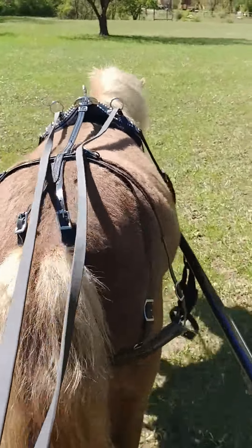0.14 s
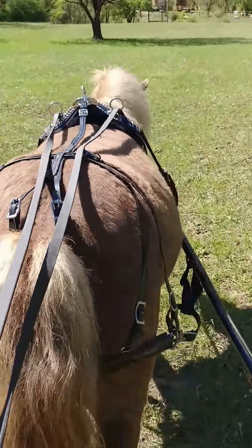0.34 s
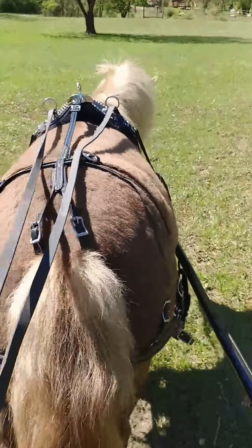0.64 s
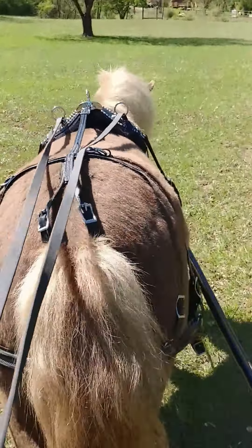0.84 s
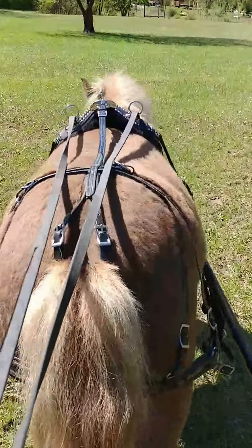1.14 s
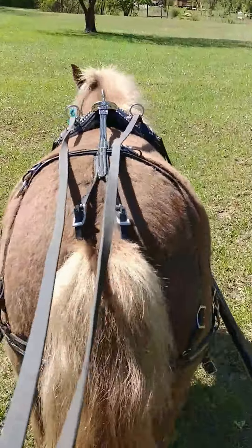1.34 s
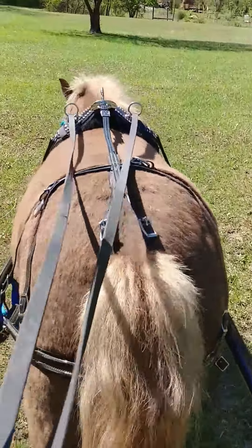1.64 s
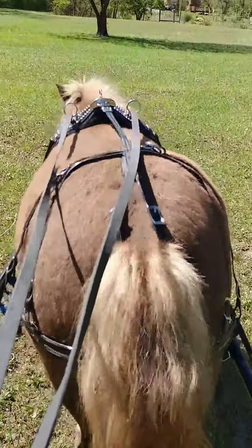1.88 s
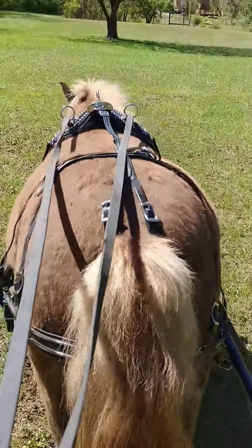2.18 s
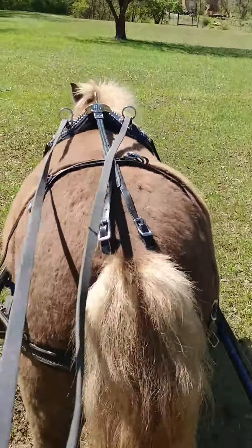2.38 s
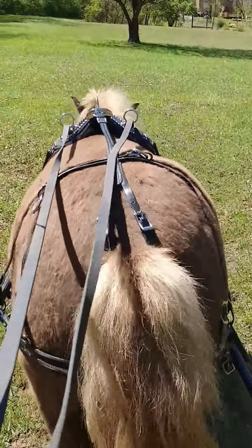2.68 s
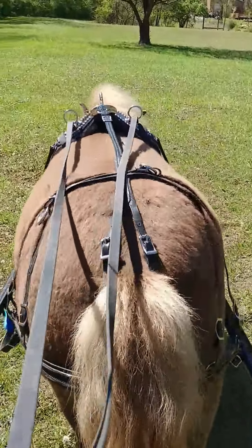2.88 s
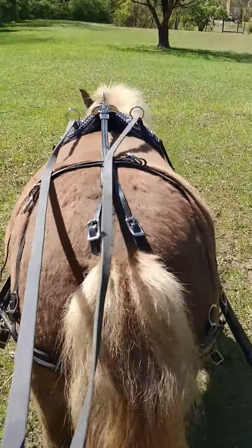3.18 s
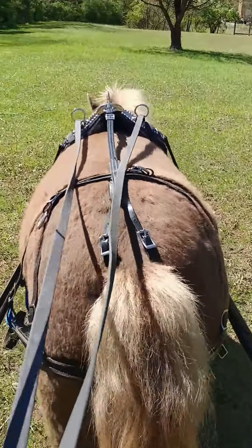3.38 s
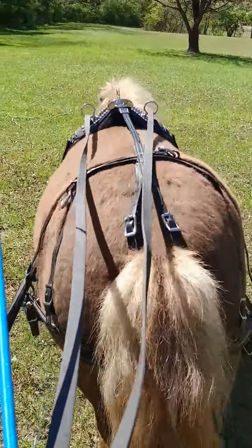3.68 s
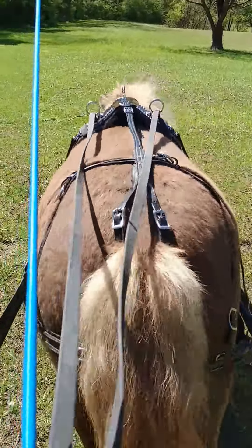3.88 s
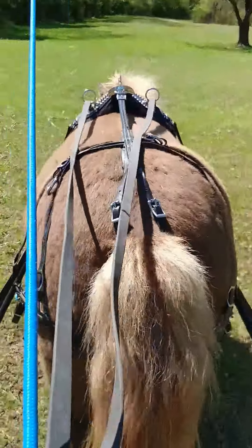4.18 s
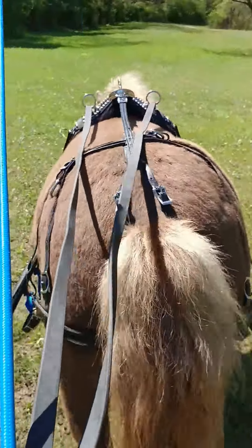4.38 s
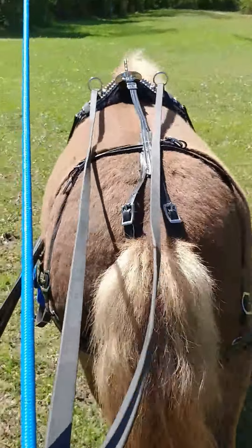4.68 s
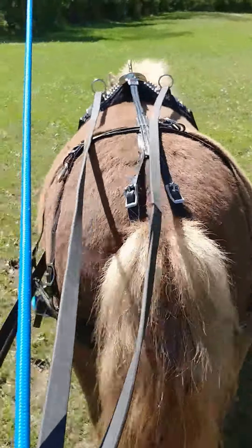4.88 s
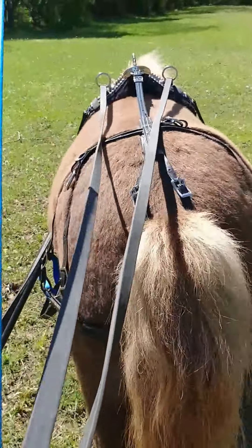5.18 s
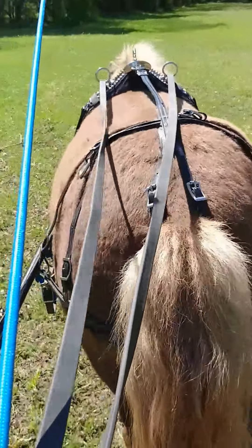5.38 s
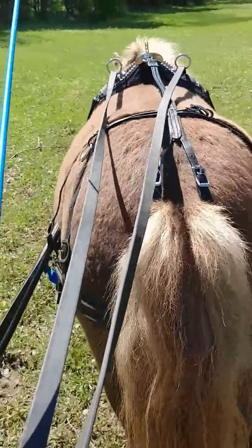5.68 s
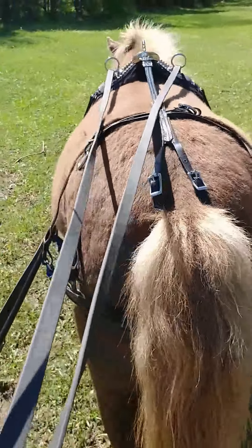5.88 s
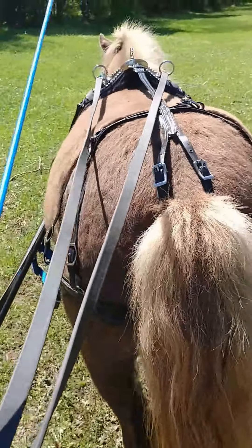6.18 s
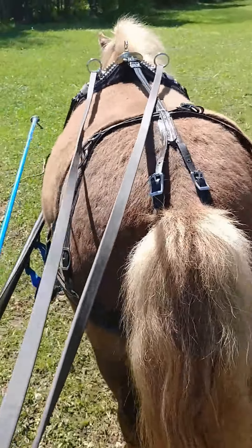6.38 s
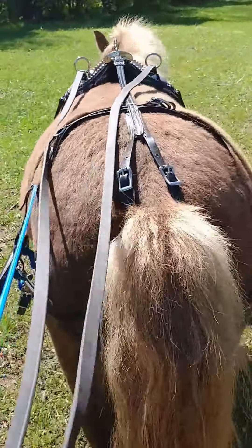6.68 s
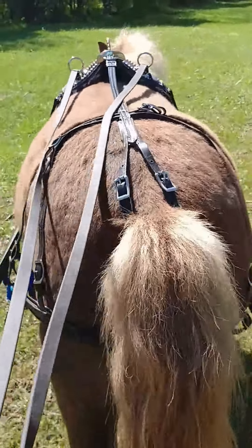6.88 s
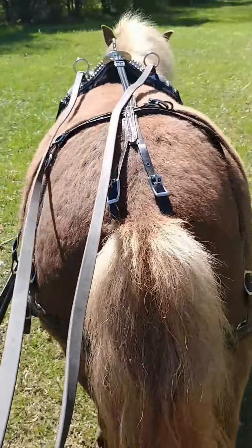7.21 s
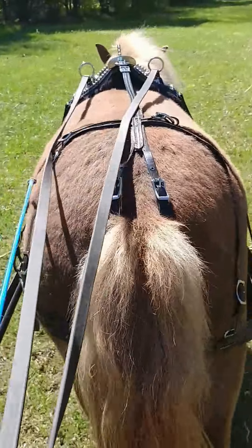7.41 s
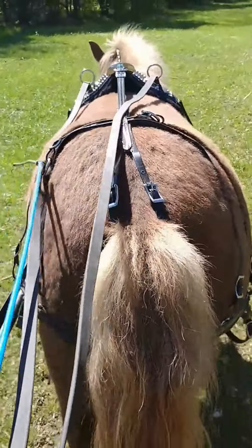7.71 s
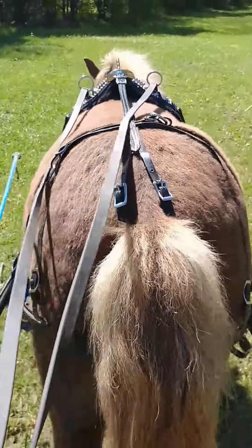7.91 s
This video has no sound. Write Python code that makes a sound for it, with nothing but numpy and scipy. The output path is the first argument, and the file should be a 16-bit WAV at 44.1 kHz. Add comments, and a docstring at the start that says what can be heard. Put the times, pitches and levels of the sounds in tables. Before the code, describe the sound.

Heard from a cart seat outdoors, a low hum wavers and briefly drops out over soft wheel rumble and muffled hoof treads in grass. A bright steel clink comes at 0.1 s with a dull bump just after, then straps swish. Paired knocks fall at 0.8, a clear one at 1.0 and a snap at 1.15. A dry click at 1.6 precedes strong clinks at 1.8, 2.1 and 2.7, and another click at 3.0. The hardest knock rings at 3.6. After lighter swishing, clinks cluster from 4.6 to 4.9 and 5.3 to 5.5, capped by a sharp dry snap at 5.6 and a lesser one at 5.8. A single clink at 6.2, then low bumps and a hum surge with a deeper clink around 6.6. Sparse clinks at 7.2 and 8.0 end it among strap rustles and faint buckle jingles.

```python
"""On a lawn, heard from the seat of a cart, a pony walks in harness.
A low wavering hum lies under the soft rumble of wheels and hoofs, made from shaped noise.
Dull bumps are short low tones; straps, buckles and dry snaps are swelling or clicking noise and steel rings.
In front, steel fittings knock on the shafts: each blow rings the steel and the crowded modes of the frame."""
import sys
import numpy as np
from scipy import signal
from scipy.fft import rfft, irfft
from scipy.io import wavfile
from scipy.ndimage import uniform_filter1d

SR = 44100
rng = np.random.default_rng(int(sys.argv[2]) if len(sys.argv) > 2 else 0)


def pcm_store(signal):
    """Save signal as 16-bit PCM."""
    levels = np.round(np.clip(np.atleast_2d(signal), -1, 1) * 32767)
    wavfile.write(sys.argv[1], SR, levels.astype(np.int16).T)


N = 355005
TIME = np.arange(N) / SR  # seconds

# The low hum, before it wavers: (t/s, level/dB)
HUM_LEVEL = [(0.0, -47.5), (0.18, -44.5), (0.4, -49), (1.15, -46.5), (1.85, -49.5), (2.4, -47),
             (3.4, -45.5), (4.3, -45.5), (4.55, -54), (4.76, -47), (5.2, -51), (6.0, -46.5), (6.47, -51.5),
             (6.63, -37.5), (6.95, -51.5), (7.5, -50.5), (8.05, -49.5)]
# Moments when the hum drops out: (t/s, depth/dB, length of each side/s)
HUM_DIPS = [(2.11, 24, 0.028), (2.269, 18, 0.028), (2.592, 23, 0.03), (5.254, 30, 0.09), (7.513, 9, 0.028)]
HUM_HZ, HUM_WAVER_DB, HUM_WAVER_HZ = 60.0, 1.5, 8.0
HUM_PHASE_RAD = 0.45  # right microphone ahead of the left

# Wheels rolling over the grass, before the gain below: (t/s, level/dB)
ROLL_LEVEL = [(0.0, -78), (0.27, -63), (2.71, -61.5), (3.07, -62.5), (3.81, -58.5), (4.03, -62.5),
              (6.55, -61.5), (8.05, -64)]
# Hoofs and wheels pressing into the turf: (t of peak/s, level/dB, length of each side/s)
TREADS = [(0.045, -53.5, 0.038), (0.164, -59, .035), (0.66, -62.5, 0.058), (0.95, -54.5, 0.0404),
          (1.063, -49.5, 0.034), (1.383, -57.5, 0.053), (1.844, -55.5, 0.02), (2.106, -57, 0.066),
          (2.302, -55.5, 0.011), (2.423, -56, 0.032), (2.727, -54, 0.049), (3.397, -53.5, 0.035),
          (3.53, -56.5, 0.034), (3.654, -47, 0.02), (3.78, -50.5, 0.044), (3.948, -59, 0.041),
          (4.588, -57, 0.046), (4.71, -56, .04), (4.9, -64, 0.048), (5.124, -53.5, 0.0518),
          (5.553, -63, 0.05), (6.003, -55, 0.018), (6.611, -45.5, .03)]
# Tone colour of the rumble, only the shape counts: (f/Hz, relative level per Hz/dB)
RUMBLE_COLOUR = [(20, -30.5), (35, -5), (48, -1.5), (80, 3), (105, -4.5), (160, -9.5), (250, -24),
                 (600, -51)]
# Tone colour of the pressed turf, only the shape counts: (f/Hz, relative level per Hz/dB)
TURF_COLOUR = [(80, -19), (200, 2), (300, -1), (550, -3), (900, -10), (1500, -14.5), (3000, -21),
               (8000, -36)]
ROLL_GAIN_DB, RUMBLE_DB = 1, -52
RUMBLE_PER_TURF = 0.62  # power below 1: the rumble swells less than the grass

# Dull bumps of hoof and wheel, before a shared 3 dB cut: (t/s, peak level/dB, f/Hz)
BUMPS = [(0.169, -28.5, 69), (1.06, -32.5, 68.5), (1.388, -52, 130), (3.39, -30, 88), (4.729, -46.5, 85),
         (5.55, -34, 69.6), (5.989, -33, 80), (6.6, -34.5, 74.3), (6.719, -38, 83.5)]

# Swishes of straps and small buckles: (start t/s, relative level/dB)
SWISHES = [(0.0, -48), (0.401, -51.5), (0.5, -58), (0.653, -52.5), (0.76, -62), (0.949, -56), (1.159, -52),
           (1.395, -56), (1.473, -55), (1.56, -58.5), (1.605, -59), (2.29, -61), (2.447, -52), (2.568, -57),
           (2.842, -53.5), (2.95, -54.5), (3.07, -54.5), (3.255, -55.5), (3.341, -49), (3.54, -59),
           (3.746, -51), (4.204, -50.5), (4.28, -57), (4.408, -60), (5.08, -59.5), (5.243, -53.5),
           (5.819, -56), (6.08, -55.5), (6.31, -56), (6.41, -56), (6.73, -72), (6.825, -64), (6.878, -60),
           (7.12, -50), (7.26, -62), (7.338, -51.5), (7.638, -50), (7.79, -59), (7.85, -58)]
# Tone colour of the rustle, only the shape counts: (f/Hz, relative level per Hz/dB)
BRUSH_COLOUR = [(600, -14.5), (1500, 1), (3500, -0.5), (5200, 1.5), (6200, -1), (7100, 1), (7900, 8.5),
                (9300, 9), (10800, -16), (13000, -3.5), (16000, -12)]
BRUSH_FLOOR_DB = -62.5  # swell between swishes, before the layer gains
SWISH_RISE_S, SWISH_HOLD_S, SWISH_FALL_S = 0.002, 0.02, 0.034
TOUCH_SHARE, TOUCH_T60_S = 0.4, 0.13  # share of the rustle's power, time to die by 60 dB
JINGLE_DB, JINGLES_PER_S = -5, 72  # small buckles shaken by the straps
JINGLE_T60_S = 0.07  # before each mode's own ring factor

# Dry snaps of strap and twig: (t/s, peak level/dB, f/Hz, bandwidth/Hz, time of the burst to die by 60 dB/s)
SNAPS = [(.866, -46.5, 660, 129, 0.069), (1.151, -31, 3560, 724, 0.05), (1.2, -48, 3700, 1200, 0.01),
         (1.573, -30.5, 8300, 3000, 0.0092), (2.991, -30.5, 7900, 6940, 0.02), (3.626, -53, 940, 200, .04),
         (4.975, -34, 7900, 3000, .006), (5.583, -19, 7200, 5000, 0.012), (5.785, -26, 1950, 900, 0.0078)]

# Blows of the fittings: (t/s, force/dB, extra steel ring/dB, extra depth/dB, extra brightness/dB,
# favoured high f/Hz, basic time to die by 60 dB/s, limited and scaled per mode below)
KNOCKS = [(0.097, -21.5, 4.5, 0, -2, 7960, 0.17), (0.143, -41, 3, 16, 5.5, 7240, 0.29),
          (0.261, -52, 2.5, 20, -1, 9200, 0.21), (0.32, -51, -3, 16, -6, 8540, .12),
          (0.806, -33.5, 0.5, 8.5, 2, 8900, 0.17), (0.825, -33, 1, 1, -4, 9400, 0.13),
          (1.0432, -22, 4, -5.5, 3.5, 8360, 0.19), (1.7816, -20, 6, -3, -3.5, 8370, .16),
          (1.842, -33, 5.5, -2, -14, 8600, 0.13), (1.989, -41, 4.5, 9, -11, 7660, 0.2),
          (2.066, -19.5, -1.5, -0.5, -5, 8100, 0.13), (2.148, -23.5, 2, 0, -11.5, 8100, 0.19),
          (2.19, -37, -6, 10, -1.5, 8300, 0.088), (2.701, -23.5, 5.5, -5, -5, 8920, 0.17),
          (3.6143, -17, -0.5, -4, -4, 9200, 0.15), (3.827, -43, -0.5, 2, -1, 8800, 0.13),
          (4.499, -47, 4.5, 24.5, 4, 7640, 0.17), (4.622, -47, 2, 10, -4, 8200, 0.38),
          (4.68, -33, 3.5, -4, -7.5, 7840, 0.49), (4.705, -24.5, 6.5, 7, 1, 7840, 0.13),
          (4.866, -42, 0, 24.5, 3, 8300, 0.14), (4.875, -28, -1.5, -5, -6, 7700, 0.2),
          (5.285, -34.5, 6.5, 3.5, 2.5, 8960, 0.15), (5.363, -27, -0.5, 1.5, -3, 8360, .18),
          (5.507, -33.5, 1, 6.5, 2, 7940, 0.25), (5.524, -28, 4.5, 17, 7, 8280, .14),
          (5.75, -49.5, 6, 7.5, 2.5, 7800, 0.22), (6.164, -27.5, -2.5, -1, -3.5, 8360, 0.17),
          (6.594, -42.5, 0, -4, -9.5, 7800, 0.64), (6.652, -29, -1, 7, -7, 8470, .19),
          (7.161, -27.5, -0.5, -2.5, -1.5, 8970, .16), (7.483, -55.5, 6, -13, 0, 7740, 0.12),
          (7.918, -49.5, 5.5, -8, -1, 8460, 0.6), (8.023, -30.5, -0.5, 2, 2.5, 8830, 0.26)]
# Modes of the steel fittings: (f/Hz, relative level/dB, factor on the ring time)
FITTINGS = [(1275, -25, 1.1), (1590, -23, 1.1), (2476, -23, 1), (3203, -18, 1), (3487, -15, 1),
            (3608, -13, 1), (4232, -12.5, 1), (4462, -14, 1), (5732, -7, 1.1), (6049, -4.5, 1.3),
            (6135, -4, 1.2), (6180, 0, 1.25), (6228, -5, 1.15), (6374, -6.5, 1), (6562, -5.5, 1),
            (6741, -7, 1), (7730, -6, 1), (7830, -5, 1.05), (7915, -5, 1.05), (7995, -6, 1), (8209, -7, .9),
            (8425, -7, .9), (8724, -7, .9), (8994, -6, .9), (9054, -7, .9)]
# Crowded modes of shafts and cart frame: (f/Hz, relative level per Hz/dB)
FRAME_COLOUR = [(200, -21.5), (1000, -12.5), (1500, -10), (2200, -5.5), (3450, 7), (3950, 3.5), (4350, 2),
                (5400, 2.5), (6250, 8), (7250, 15.5), (9100, 15), (10700, -6.5), (13000, 10.5), (16000, -8)]
# How long the frame rings at each pitch: (f/Hz, factor on the ring time)
FRAME_RING = [(800, 1.85), (2100, 1.19), (6000, 0.92), (9000, 0.9), (14000, 0.59)]
RAGGED_DB = 5.5  # unevenness between clusters of frame modes
LONGEST_RING_S = 0.21  # limit on the steel's ring time, before each mode's factor
CLATTER_DB, CLATTER_PER_DEPTH = -1.5, 0.62  # the deeper a blow, the more the frame clatters
PAN_DB, PAN_PER_DEPTH = 0.35, 0.08  # left minus right: the deep blows lie to the left

LEFT_LAG_S = 0.0002885  # the sound reaches the right microphone first
EDGE_HZ = 15900  # upper band limit


def gain_of(db):
    """Turns decibels into amplitude."""
    return 10 ** (np.asarray(db) / 20)


def evened(x):
    """Scales x to an overall rms of 1."""
    return x / np.sqrt(np.mean(x ** 2) + 1e-20)


def read(points, hz):
    """Reads a curve between its points, on a log-frequency axis."""
    f, value = np.transpose(points)
    return np.interp(np.log(hz + 1), np.log(f + 1), value)


def follow(points):
    """Reads a (time, value) curve at every sample."""
    t, value = np.transpose(points)
    return np.interp(TIME, t, value)


def add(mix, s, sound):
    """Mixes a sound in at time s, cutting it off at the end of the mix."""
    part = mix[:, round(s * SR):][:, :sound.shape[1]]
    part += sound[:, :part.shape[1]]


def drift(hz):
    """Random wandering of rms 1, changing at rates up to about hz."""
    f = np.fft.rfftfreq(N, 1 / SR)
    return evened(irfft(rfft(rng.standard_normal(N)) * np.exp(-(f / hz) ** 2), N))


def noise_pair(size, alike):
    """White noise at two microphones; alike is the share of power they have in common."""
    shared, *own = rng.standard_normal((3, size))
    alike = np.clip(alike, 0, 1)
    return np.sqrt(alike) * shared + np.sqrt(1 - alike) * np.array(own)


def coloured(x, spectrum):
    """Gives x a tone colour, at an overall rms of 1."""
    hz = np.fft.rfftfreq(N, 1 / SR)
    return evened(irfft(rfft(x) * gain_of(read(spectrum, hz)), N))


def hump(s, rise_s, fall_s):
    """A smooth bell-shaped swell of height 1 that peaks at time s."""
    side_s = np.where(TIME < s, rise_s, fall_s)
    return np.exp(-np.minimum(((TIME - s) / side_s) ** 2, 50))


def hum():
    """A low tone that wavers and now and then drops out, slightly out of step between the microphones."""
    turns = np.cumsum(HUM_HZ + 0.36 * drift(hz=2.95)) / SR
    phase = np.array([[0], [HUM_PHASE_RAD]])
    tone = np.sqrt(2) * np.sin(2 * np.pi * turns + phase)
    dips_db = sum(db * hump(s, length, length) for s, db, length in HUM_DIPS)
    level_db = follow(HUM_LEVEL) - dips_db + HUM_WAVER_DB * drift(hz=HUM_WAVER_HZ)
    return tone * gain_of(level_db + np.array([[0.5], [-0.7]]))


def rolling():
    """Wheels rumble and press the grass down unevenly; each tread swells both."""
    treads = sum(gain_of(db) ** 2 * hump(s, length, length) for s, db, length in TREADS)
    power = gain_of(follow(ROLL_LEVEL) + ROLL_GAIN_DB) ** 2 + treads
    turf_swell = np.sqrt(power) * gain_of(0.78 * drift(hz=7.8))

    rumble_swell = evened(turf_swell ** RUMBLE_PER_TURF) * gain_of(RUMBLE_DB + 0.5 * drift(hz=18))
    rumble = coloured(noise_pair(N, alike=0.97), RUMBLE_COLOUR) * rumble_swell

    crush = noise_pair(N, alike=0.75) * gain_of(1.73 * drift(hz=65.4))
    turf = coloured(crush, TURF_COLOUR) * turf_swell * gain_of(-0.3)
    return rumble + turf


def bumps(size=12000):
    """The cart body takes a jolt and swings a few times: a low tone that swells and dies."""
    out, t = np.zeros((2, N)), np.arange(size) / SR
    swell = t / 0.0034  # the envelope peaks after 3.4 ms
    envelope = swell * np.exp(1 - swell)
    for s, db, hz in BUMPS:
        add(out, s, gain_of(db - 3.0) * envelope * np.sin(2 * np.pi * hz * t)[None])
    return out


def swish(start_s, size=16000):
    """A strap slips: a quick start, a short slide, a soft fall."""
    t, out = np.arange(size) / SR, np.zeros((1, N))
    rise = 1 - np.exp(-t / SWISH_RISE_S)
    fall = np.exp(-np.maximum(t - SWISH_HOLD_S, 0) / SWISH_FALL_S)
    add(out, max(start_s, 0), (rise * fall)[None])
    return out[0]


def steel_ring(t60, size, spread_db=9.5, waver=0.9):
    """The fittings' own modes; each ring beats, and the two microphones hear a different mix of them."""
    t = np.arange(size) / SR
    hz, db, ring = np.transpose(FITTINGS)
    luck = rng.uniform(-0.91, 1, (len(FITTINGS), 6)).T
    strength = gain_of(db - 8.5 + spread_db * luck[0] + 0.69 * luck[1:3])
    phase = np.pi * luck[3] + 0.74 * luck[4:6]
    # the imaginary part sets the pitch, the real part the decay
    poles = 2j * np.pi * hz - np.log(1000) / (min(t60, LONGEST_RING_S) * ring)
    # a second tone close to each mode makes it beat, as the parts swing
    swing_hz, start = rng.uniform(-77.5, 72.0, (len(hz), 1)), rng.random((len(hz), 1))
    swing = 1 + waver * np.exp(2j * np.pi * (swing_hz * t + start))
    modes = np.exp(poles[:, None] * t) * swing
    return ((strength * np.exp(1j * phase)) @ modes).real


def brushing(touches_per_s=30, size=6000):
    """Hair and straps rustle in swishes, with tiny touches that die away and buckles that jingle."""
    touches = (rng.random(N) < touches_per_s / SR) * rng.uniform(0.029, 1, N)
    fade = np.exp(-2 * np.log(1000) / (TOUCH_T60_S * SR))  # power kept per sample
    dying = signal.lfilter([1], [1, -fade], touches)
    power = 1 - TOUCH_SHARE + TOUCH_SHARE * dying / dying.mean()
    grain = noise_pair(N, alike=0.128) * np.sqrt(power) * gain_of(1.5 * drift(hz=250))

    swish_power = sum((gain_of(db) * swish(s)) ** 2 for s, db in SWISHES)
    swell = np.sqrt(gain_of(BRUSH_FLOOR_DB) ** 2 + swish_power)
    rustle = coloured(grain, BRUSH_COLOUR) * swell * gain_of(2.5)

    shakes = evened((rng.random(N) < JINGLES_PER_S / SR) * rng.uniform(-1, 1, N))
    buckle = steel_ring(JINGLE_T60_S, size)
    buckle = buckle / np.linalg.norm(buckle[0])
    jingle = signal.oaconvolve((shakes * swell)[None], buckle, axes=1)[:, :N]
    return rustle + jingle * gain_of(JINGLE_DB)


def snaps(size=4000):
    """Short clicks: dying noise through one band, with no steel ring."""
    out, t = np.zeros((2, N)), np.arange(size) / SR
    for s, db, hz, width_hz, t60 in SNAPS:
        burst = noise_pair(size, alike=0.16) * gain_of(-60 * t / t60)
        band = np.clip([hz - width_hz / 2, hz + width_hz / 2], 20, SR / 2 - 1)
        bandpass = signal.butter(3, band, "bandpass", fs=SR, output="sos")
        click = signal.sosfilt(bandpass, burst)
        add(out, s, gain_of(db) * click / abs(click).max())
    return out


def frame_ring(t60, size, ragged_decay=0.12):
    """The frame's crowded modes: each point of contact wakes some clusters more than others."""
    # cut noise into short frequency slices, then let each slice die at its own pace
    hz, when, z = signal.stft(noise_pair(size, alike=0.22), SR, nperseg=512)
    broad, fine, lasting = rng.standard_normal((3, len(hz)))
    clusters = np.tanh(evened(uniform_filter1d(broad, size=3)) + 0.5 * fine)
    decay = t60 * read(FRAME_RING, hz) * np.exp(ragged_decay * (clusters + np.tanh(lasting)))
    start_db = read(FRAME_COLOUR, hz) + RAGGED_DB * clusters
    z = z * gain_of(start_db[:, None] - 60 * when / decay[:, None])
    return gain_of(-0.5) * signal.istft(z, SR, nperseg=512)[1][:, :size]


def knock(force_db, ring_db, depth_db, bright_db, favoured_hz, t60, size=20000):
    """One blow rings the fittings and the frame; its depth and brightness colour both."""
    t, hz = np.arange(size) / SR, np.fft.rfftfreq(2 * size, 1 / SR)
    t60 = np.clip(t60, 0.03, 0.5)
    clatter_db = CLATTER_DB + CLATTER_PER_DEPTH * depth_db
    pan_db = PAN_DB + PAN_PER_DEPTH * depth_db
    sound = gain_of(-1.2) * frame_ring(t60, size) + gain_of(ring_db) * steel_ring(t60, size)

    # a heavy blow shakes the frame; a sharp one reaches the high modes, some more than others
    colour = [(1200, depth_db - 4.5), (1900, depth_db + 0.5), (2800, clatter_db), (4600, clatter_db),
              (5300, 0.5), (5700, 0.5), (6150, 1.0), (6600, -0.5),
              (7400, bright_db - 5), (7900, bright_db - 3.5),
              (10000, bright_db + 0.5), (12500, bright_db - 9.0)]
    favour_db = 8.9 * np.exp(-((hz - favoured_hz) / 240) ** 2)
    colour_db = read(colour, hz) + favour_db
    sound = irfft(rfft(sound, 2 * size) * gain_of(colour_db))[:, :size]

    # each blow starts a little softened, weak ones more so, and swells to full level over a few ms
    rise_s = np.interp(force_db, [-50, -30], [0.004, 0.001])
    onset = (1 - np.exp(-(t / rise_s) ** 2)) * (1 - 0.48 * np.exp(-t / 0.0032))
    return sound * onset * gain_of(force_db + np.array([[pan_db], [-pan_db]]) / 2)


def harness():
    """All the blows of the fittings; the loose parts chatter, so the level flickers quickly."""
    out = np.zeros((2, N))
    for s, *blow in KNOCKS:
        add(out, s, knock(*blow))
    return out * gain_of(1.0 * drift(hz=218))


def scene():
    """Adds all layers; the sound reaches the left microphone a little later than the right."""
    left, right = hum() + rolling() + bumps() + brushing() + snaps() + harness()
    late = np.exp(-2j * np.pi * np.fft.rfftfreq(N, 1 / SR) * LEFT_LAG_S)
    return np.array([irfft(rfft(left) * late, N), right])


def record(dry):
    """Two microphones with weak deep bass, the left one duller at the top, then the upper band limit."""
    hz = np.fft.rfftfreq(N, 1 / SR)
    # left minus right
    balance_db = read([(1000, -0.5), (3000, -0.4), (7000, 0.6), (9000, -3.5), (11500, -8.5), (14000, -4)], hz)
    bass_db = read([(15, -26.0), (30, -13.0), (42, 0.5)], hz)
    tone_db = bass_db + np.array([balance_db, -balance_db]) / 2
    heard = irfft(rfft(dry) * gain_of(tone_db), N)
    lowpass = signal.firwin(511, EDGE_HZ, window=("kaiser", 9), fs=SR)
    return signal.oaconvolve(heard, lowpass[None], "same")


dry = scene()
out = record(dry)
pcm_store(out)
```